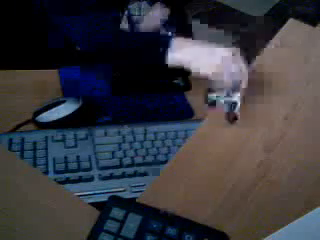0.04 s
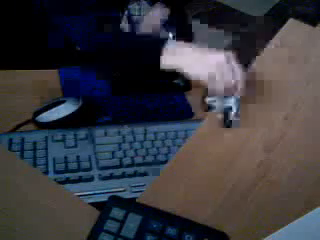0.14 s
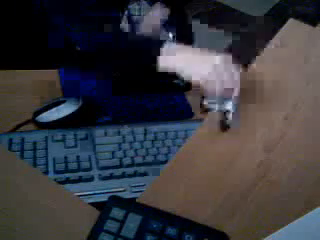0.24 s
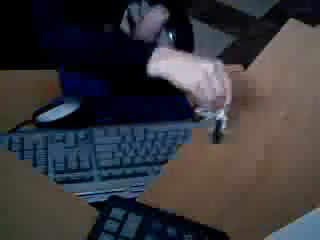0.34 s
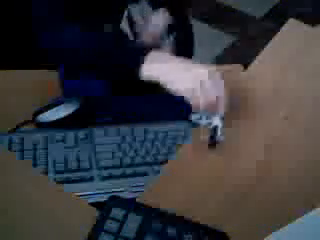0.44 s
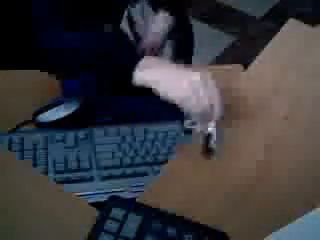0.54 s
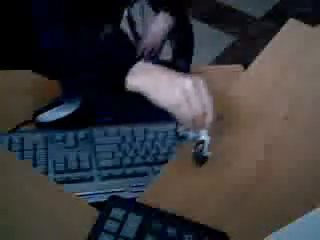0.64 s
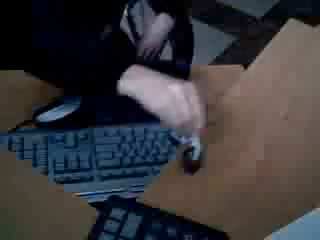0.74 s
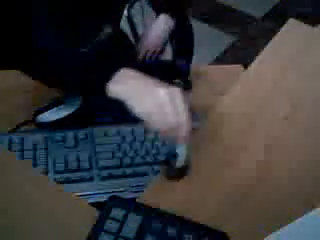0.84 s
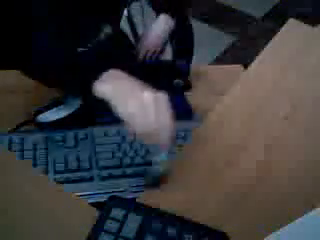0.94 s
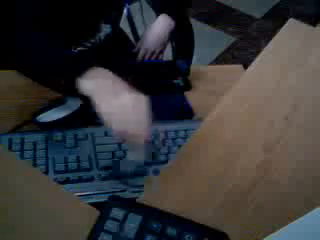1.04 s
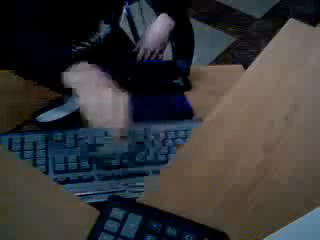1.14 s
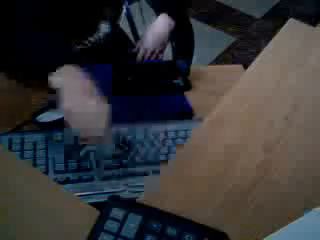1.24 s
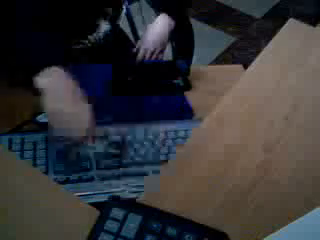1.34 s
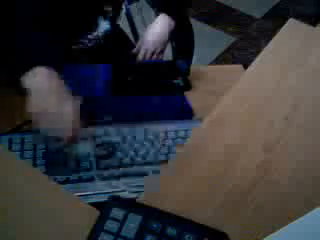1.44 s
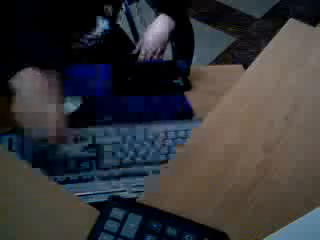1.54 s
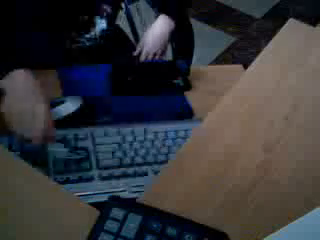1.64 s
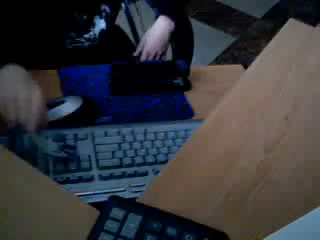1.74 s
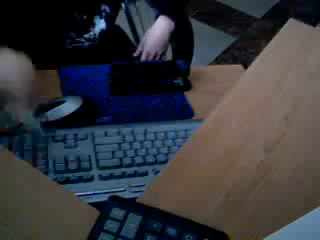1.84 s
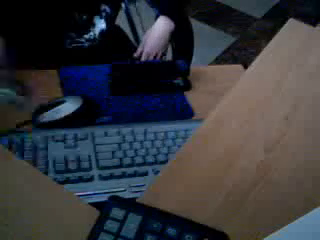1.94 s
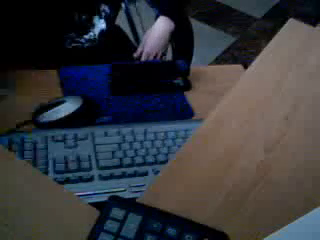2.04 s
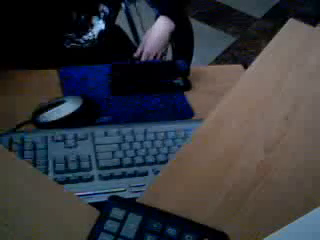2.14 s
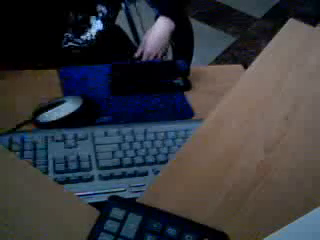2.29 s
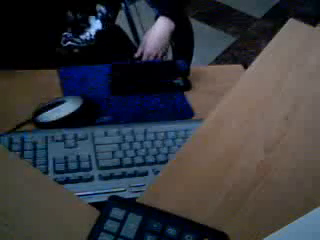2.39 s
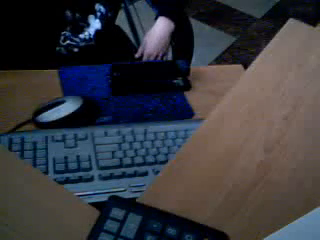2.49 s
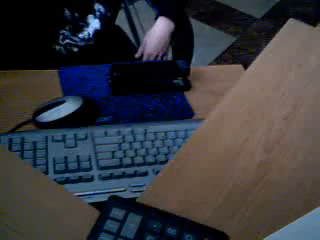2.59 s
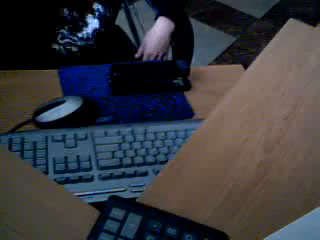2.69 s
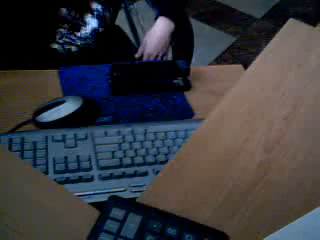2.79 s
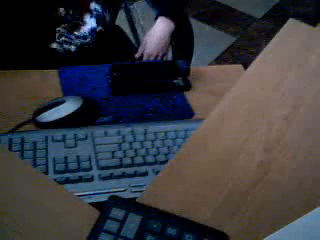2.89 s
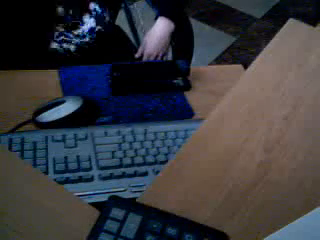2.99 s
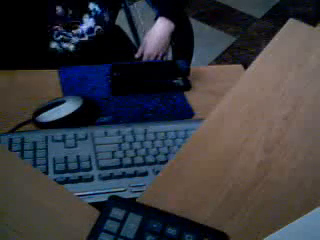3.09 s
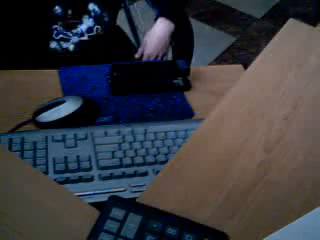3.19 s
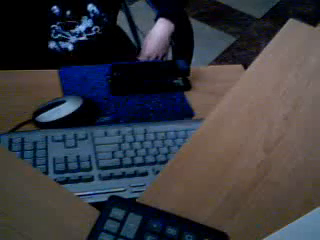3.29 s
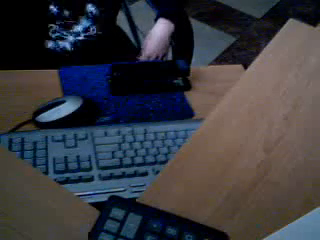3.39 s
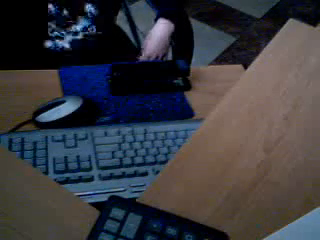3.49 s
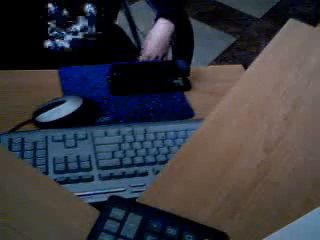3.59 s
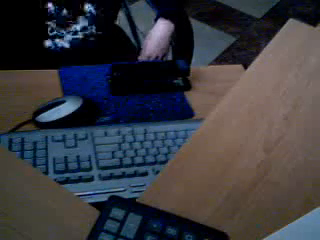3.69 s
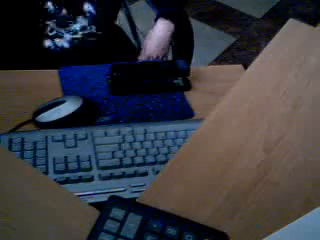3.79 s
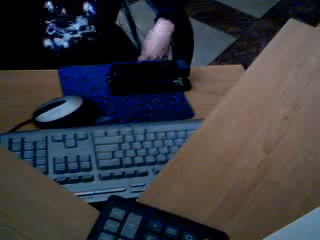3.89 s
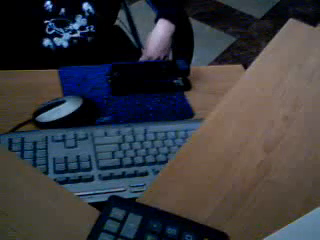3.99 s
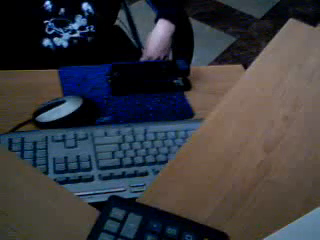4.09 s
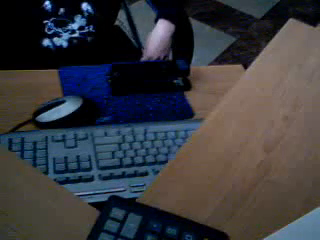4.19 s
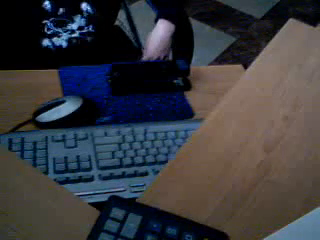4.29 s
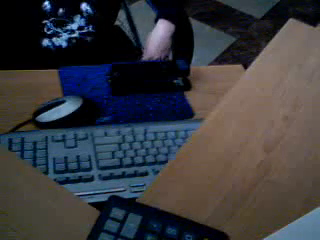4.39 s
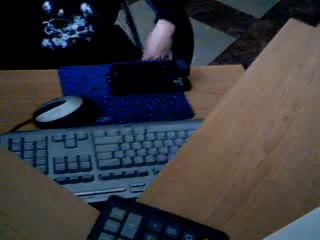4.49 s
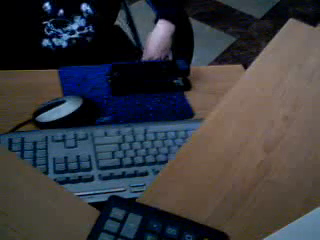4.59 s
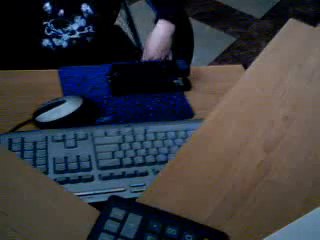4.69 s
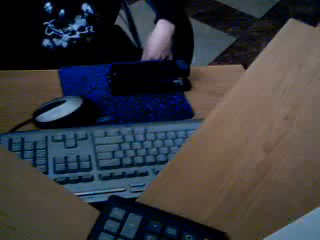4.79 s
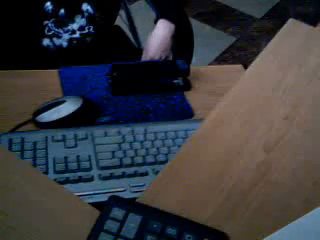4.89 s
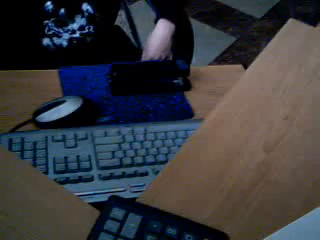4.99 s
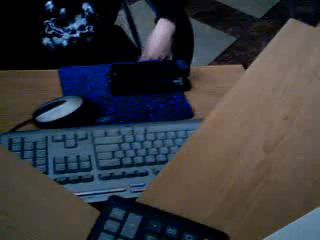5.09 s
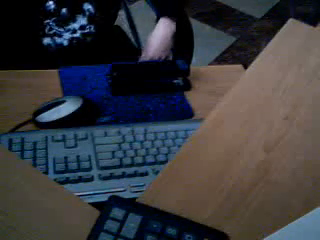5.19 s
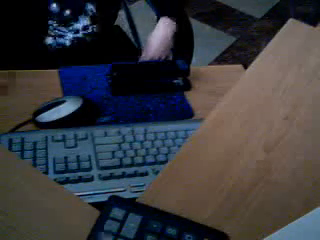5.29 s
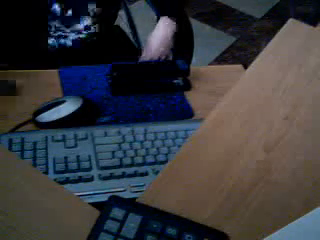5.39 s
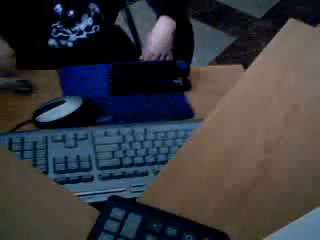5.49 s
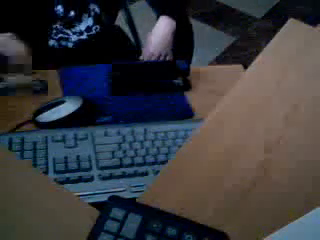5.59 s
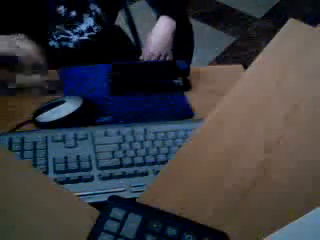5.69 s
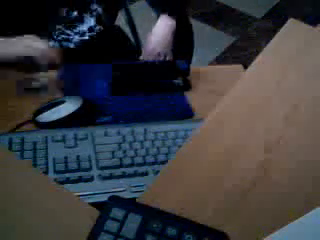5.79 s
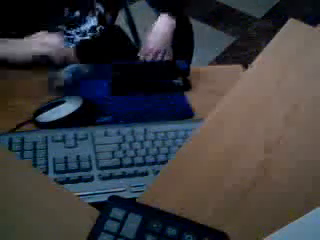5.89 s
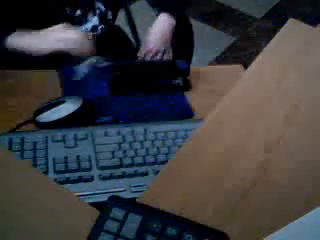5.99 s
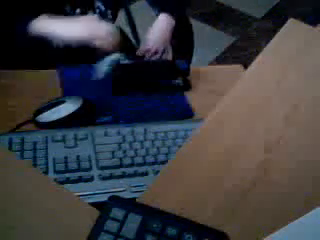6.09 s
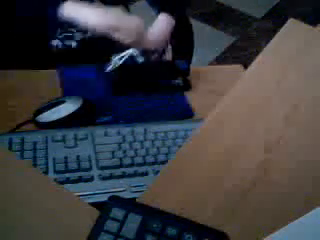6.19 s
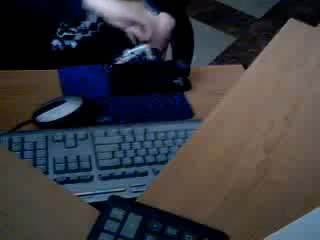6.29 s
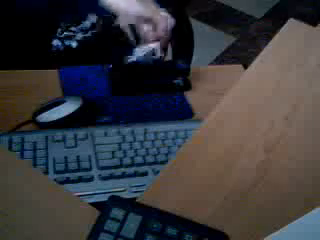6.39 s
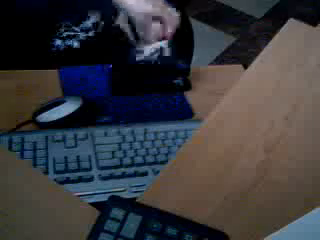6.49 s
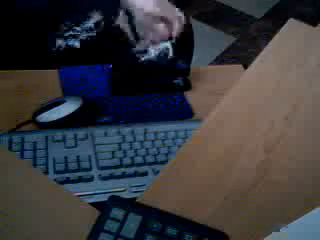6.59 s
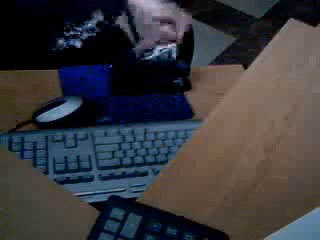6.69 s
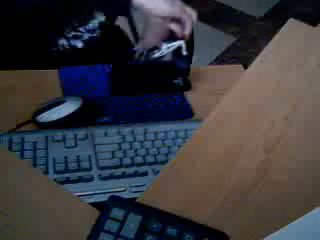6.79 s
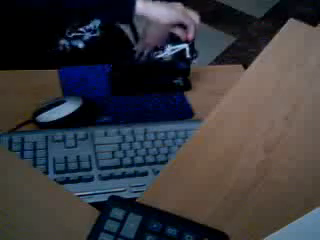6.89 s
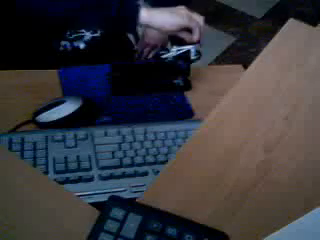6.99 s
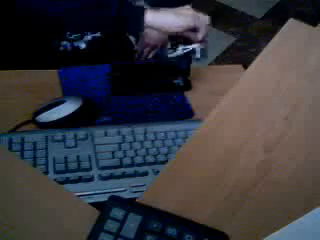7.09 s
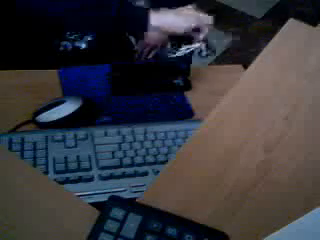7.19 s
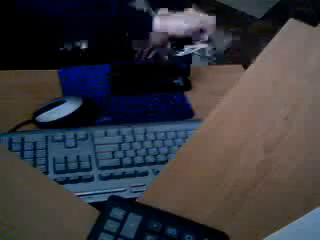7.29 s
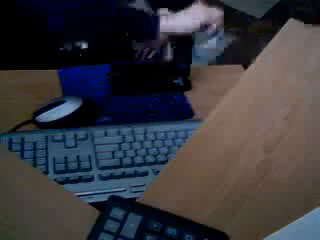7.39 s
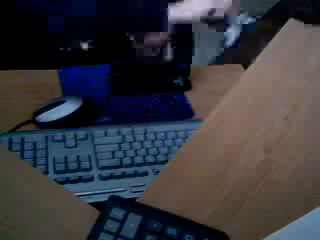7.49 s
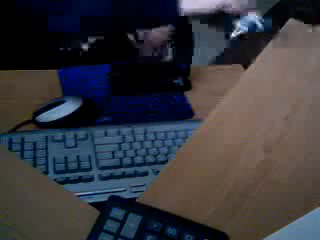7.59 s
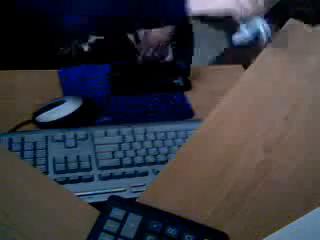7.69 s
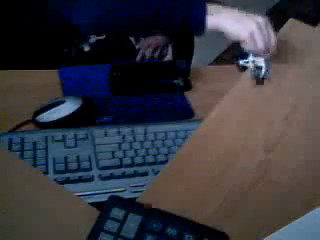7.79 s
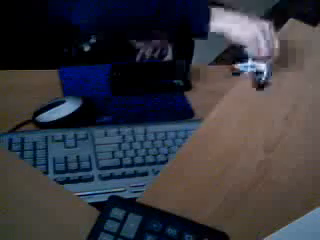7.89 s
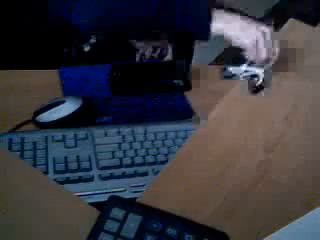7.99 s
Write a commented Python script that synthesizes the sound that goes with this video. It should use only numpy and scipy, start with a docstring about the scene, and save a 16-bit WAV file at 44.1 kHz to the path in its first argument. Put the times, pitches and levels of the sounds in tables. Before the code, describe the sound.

Tiny wheels rumble briefly on wood, followed by irregular knocks and ringing clicks from a toy bike, close to a humming microphone.

```python
"""Wood rumbles and clacks, with small metal clicks: a finger bike rolls down a wooden board, hops over
a keyboard, is knocked about on the desk and lands on the board again. Its wheels shake the board,
each blow makes the wood ring, and the little metal frame clicks and rings. A cheap desk microphone
adds hum and hiss and overloads on the hardest landings. A thin echo, as from desk speakers, follows
each bright click."""
import sys
import numpy as np
from scipy import signal
from scipy.fft import rfft, irfft, next_fast_len
from scipy.io import wavfile

SR = 44100
rng = np.random.default_rng(int(sys.argv[2]) if len(sys.argv) > 2 else 0)


def transcribe(signal):
    """Save signal, clipped to [-1, 1], as a 16-bit WAV file at the path in sys.argv[1]."""
    frames = np.atleast_2d(signal).T
    limited = np.clip(frames, -1, 1)
    pcm = np.round(limited * 32767).astype(np.int16)
    wavfile.write(sys.argv[1], SR, pcm)


N = 355005
T = np.arange(int(.7 * SR)) / SR  # time within one blow
HZ = np.fft.rfftfreq(4096, 1 / SR)  # the pitches at which tone curves are drawn


def amp(db):
    """Turns decibels into a volume factor."""
    return 10 ** (np.asarray(db) / 20)


def evened(x):
    """Scales a sound to an average (rms) level of 1."""
    return x / np.sqrt(np.mean(x ** 2) + 1e-20)


def curve(points):
    """Joins (pitch_hz, level_db) points into a tone curve."""
    hz, db = np.transpose(points)
    return np.interp(np.log(HZ + 1), np.log(hz + 1), db)


def bell(hz, octaves):
    """A hump of height 1 around the pitch hz."""
    return np.exp(-.5 * (np.log2((HZ + 1) / hz) / octaves) ** 2)


def colour(x, db):
    """Filters a sound by a tone curve, so that nothing rings before it starts."""
    log_gain = np.log(amp(np.r_[db, db[-2:0:-1]]))
    taps = np.fft.ifft(np.exp(np.conj(signal.hilbert(log_gain)))).real
    return signal.fftconvolve(x, taps)[:len(x)]


def low_pass(x, hz):
    """Cuts away the treble above hz."""
    taps = signal.firwin(511, hz, window=("kaiser", 8), fs=SR)
    return signal.oaconvolve(x, taps[None], "same")


def fade(t60):
    """Dies away by 60 dB in t60 seconds."""
    return np.exp(-np.log(1000) * T / max(t60, 1e-3))


def sized(x, t60):
    """Gives a blow the energy of a sound that starts at level 1 and dies in t60 seconds."""
    return x * np.linalg.norm(fade(t60)) / np.linalg.norm(x)


def add(mix, start_s, sound):
    """Mixes a sound in at start_s."""
    part = mix[max(round(start_s * SR), 0):][:len(sound)]
    part += sound[:len(part)]


def hiss(level_db=-40.5):
    """Room rumble and microphone hiss, with a small peak in the treble."""
    # tone of the steady noise: pitch_hz, level_db
    noise_tone = [(22, 5), (33, -25), (57, 3.5), (95, -18.5), (135, -4), (215, -14), (300, -22.5),
                  (680, -20.5), (1500, -21), (1900, -26.5), (3400, -26.5), (6950, -26), (7300, -31.5),
                  (8100, -30.5)]
    tone_db = curve(noise_tone) + 4 * bell(4870, 0.053)
    return amp(level_db) * evened(colour(rng.standard_normal(N), tone_db))


def hum(waver=0.025):
    """Mains hum in the microphone, wavering slightly."""
    # the hum's tones: pitch_hz, level_db
    tones = [(59.5, -52.5), (119, -49.5)]
    t = np.arange(N) / SR
    drift = waver * np.interp(t, np.linspace(0, N / SR, 60), rng.standard_normal(60))
    return sum(np.sqrt(2) * amp(db) * np.sin(2 * np.pi * hz * t + drift) * (1 + drift)
               for hz, db in tones)


def room(x, wet_db=-12, t60=0.52):
    """Adds the room's many reflections as a dying tail."""
    tail = rng.standard_normal(len(T)) * fade(t60)
    return x + amp(wet_db) * signal.fftconvolve(x, tail / np.linalg.norm(tail))[:len(x)]


def speaker_echo(x, delay_s=.2235):
    """Small speakers repeat the sound late and thin, then repeat their own echo."""
    thin_db = -12.5 - 26 * (1 - bell(4900, 0.064))
    echoes = np.zeros(N)
    for turn in (1, 2):
        x = room(colour(x, thin_db), wet_db=-0.5, t60=.25)
        add(echoes, turn * delay_s, x)
    return echoes


def ring(tones, spread_db, damping=1):
    """A struck object's dying tones; random strengths and signs stand for the spot that is hit."""
    shares = amp(spread_db * rng.standard_normal(len(tones))) * rng.choice([-1, 1], len(tones))
    return sum(share * amp(db) * np.sin(2 * np.pi * hz * T) * fade(t60 / damping)
               for share, (hz, db, t60) in zip(shares, tones))


def wood(t60, damping, tones_db):
    """Struck wood rings at a few main pitches, with noisy clatter between them."""
    # ringing tones of board and desk: pitch_hz, level_db, fade_s (before damping)
    wood_tones = [(115.9, -16, 0.39), (212.8, -7, 0.19), (247.4, -9.5, 0.19), (298.8, -5.5, 0.17),
                  (398, -3.5, 0.22), (504, -9.5, 0.088), (578, -16, 0.28), (660, -4.5, 0.2),
                  (731.7, -11, 0.28), (850, -1.5, 0.11), (975, -1.5, 0.069), (1063, -4, 0.067),
                  (1097, -2, 0.12), (1184.5, -1.5, 0.17), (1295, -3, 0.15), (1400, -4.5, 0.14),
                  (1490, -0.5, 0.051), (1566, -9.5, 0.094), (1758, -9, 0.082), (1972, -15, 0.13)]
    # tone of the clatter: pitch_hz, level_db
    clatter_tone = [(50, -44), (110, -1.5), (230, -7), (420, -2), (520, -4.5), (800, -1.5), (1200, -1.5),
                    (1500, -4.5), (1800, -11.5), (2300, -23.5), (3500, -35), (5000, -24), (8000, -53.5)]
    clatter = colour(rng.standard_normal(len(T)) * fade(t60), curve(clatter_tone))
    return evened(clatter) + amp(tones_db) * evened(ring(wood_tones, spread_db=2, damping=damping))


def effort(rise_s=0.022, coast_db_per_s=136.5, handling_db=-50.5):
    """How hard the wood is rubbed: each push starts quickly, speeds up or slows, then coasts out."""
    # pushes of the bike: start_s, length_s, start_level_db, slope_db_per_s
    pushes = [(0.116, .57, -42.5, 24.5), (0.829, 0.11, -27.5, -66), (1.558, 0.18, -46.5, -15),
              (2.29, 0.51, -44, -6), (2.864, 0.37, -43, -5.5), (3.867, 0.032, -45.5, 0),
              (4.46, 0.098, -40.5, -44), (4.71, 0.25, -46.5, -15), (6.7, 0.3, -51.5, -15),
              (7.88, 0.14, -35, -20)]
    t = np.arange(N) / SR
    power = np.full(N, amp(handling_db) ** 2)  # the fingers never quite rest
    for start_s, length_s, level_db, slope in pushes:
        age = t - start_s
        pushed_db = level_db + slope * np.clip(age, 0, length_s)
        coast_db = coast_db_per_s * np.maximum(age - length_s, 0)
        power += (np.clip(age / rise_s, 0, 1) * amp(pushed_db - coast_db)) ** 2
    return np.sqrt(power)


def rolling(jolts_per_s=700, spots=3):
    """Wheels and fingers pass over the grain, and its tiny jolts shake the board at a few spots."""
    # how strongly the tyres shake the board: pitch_hz, level_db
    tyre_tone = [(60, -10.5), (150, 9.5), (225, 13.5), (300, 4), (400, 5.5), (600, 8), (880, 1), (1400, 0),
                 (2000, -0.5), (8000, -18.5)]
    rumble = np.zeros(N)
    for _ in range(spots):
        sizes = amp(3.5 * np.minimum(rng.exponential(1, N), 3)) * rng.choice([-1, 1], N)
        jolts = sizes * (rng.random(N) < jolts_per_s / spots / SR)
        board = colour(wood(0.065, damping=0.95, tones_db=2.5), curve(tyre_tone))
        rumble += signal.fftconvolve(jolts, board)[:N]
    return evened(rumble) * effort()


def frame_clicks(t60=.065, rise_s=0.00086):
    """The bike's hard parts give short, bright cracks, and its metal frame rings in the room."""
    # clicks: start_s, crack_db, pitch_hz, width_octaves, ring_db
    clicks = [ (0.82, -31.5, 4000, .45, -59), (1.195, -29.5, 6900, 0.11, -37),
              (1.207, -25.5, 4900, 0.76, -54), (1.293, -35.5, 4670, 0.6, -46), (2.017, -23, 4870, .1, -57),
              (2.068, -27.5, 3330, 0.36, -43), (2.326, -40, 4700, 0.15, -50),
              (3.441, -38.5, 4730, 0.16, -60), (3.516, -32, 2380, 0.29, -46),
              (3.519, -22, 4985, .12, -37.5), (3.982, -38.5, 3900, .3, -68), (5.243, -21.5, 1970, .08, -44),
              (5.245, -26.5, 2610, 0.074, -51), (5.260, -31, 5200, 0.42, -50),
              (6.039, -43.5, 4560, .18, -64), (6.629, -35, 4950, .2, -36.5), (7.147, -31, 6500, 0.67, -60),
              (7.153, -20, 5470, 0.46, -25.5), (7.153, -23, 2560, 0.083, -53),
              (7.154, -24.5, 1170, 0.22, -60), (7.765, -26.5, 3800, .42, -42)]
    # ringing tones of the frame: pitch_hz, level_db, fade_s
    frame_tones = [(4253, -10.5, 0.46), (4313, -3, 0.1), (4743, 4, 0.099), (4730, -12.5, .45),
                   (4850, -21.5, 0.25), (5770, -3.5, 0.11), (5900, -27, 0.096), (7050, -6.5, 0.13),
                   (7300, -22, 0.12), (7300, -23, 0.12)]
    mix = np.zeros(N)
    for start_s, crack_db, pitch_hz, octaves, ring_db in clicks:
        burst = rng.standard_normal(len(T)) * fade(t60) * (1 - np.exp(-T / rise_s))
        tone_db = 20 * np.log10(bell(pitch_hz, octaves) + amp(-26))
        crack = amp(crack_db) * sized(colour(burst, tone_db), t60)
        metal = amp(ring_db) * ring(frame_tones, spread_db=-4)
        add(mix, start_s, room(crack + metal))
    return mix


def late_bass(x, lag_s=0.004115, corner_hz=600):
    """Low bending waves cross the board more slowly, so the bass arrives late."""
    size = next_fast_len(2 * len(x))
    hz = np.fft.rfftfreq(size, 1 / SR)
    delay_s = lag_s / (1 + (hz / corner_hz) ** 4)
    phase = 2 * np.pi * np.cumsum(delay_s) * hz[1]
    return irfft(rfft(x, size) * np.exp(-1j * phase), size)[:len(x)]


def knock(tone_db, t60, tail_db, desk_t60=0.51):
    """One blow on wood, damped by the hand, after which desk and room ring on."""
    blow = colour(wood(t60, damping=0.16 / t60, tones_db=2), tone_db)
    tail = colour(wood(desk_t60, damping=0.55, tones_db=0.5), tone_db)
    blow *= 1 - np.exp(-T / 0.0012)  # the first touch is soft
    swell = 1 - np.exp(-T / 0.014)  # the desk takes a moment to answer
    return late_bass(sized(blow, t60) + amp(tail_db) * swell * sized(tail, desk_t60))


def hand_bumps():
    """The hand bumps the desk: soft, broad blows that wake its low tones."""
    # dull bumps: start_s, level_db, pitch_hz
    bumps = [(5.874, -37, 149), (6.046, -34, 148), (6.629, -33.5, 195), (7.165, -37, 150)]
    mix = np.zeros(N)
    for start_s, level_db, pitch_hz in bumps:
        tone_db = 25 * bell(114, 0.33) + 21 * bell(pitch_hz, 0.1)
        add(mix, start_s, amp(level_db) * knock(tone_db, t60=0.32, tail_db=-17))
    return mix


def bike_knocks(leaves_board_s=1.1, back_on_board_s=7.5):
    """The bike clacks on the wood; each spot it strikes boosts a pitch of its own."""
    # blows on wood: start_s, level_db, hollow_db, hard_db, spot_hz, spot_boost_db, tail_db
    knocks = [ (0.031, -36, 3, -4, 1290, -4, -2), (0.150, -35.5, 10, 1, 1320, 0, -8),
              (0.767, -27.5, 22, -13, 290, 9, -28), (0.796, -28.5, 30, -1, 230, 6, -31),
              (0.822, -19.5, 12, 2, 330, 1, -22), (0.871, -24.5, 11, -2, 1450, 8, -21),
              (0.907, -28.5, 21, -9, 1190, 14, -19), (1.202, -22.5, -5, 4, 1060, 4.5, -8),
              (1.294, -29, -6.5, 1, 1040, -2, -7), (1.504, -33.5, 1, -6, 1080, 0, -3.5),
              (2.015, -11.5, 1.5, -1, 1354, 6.5, -23), (2.022, -14, 5.5, 1, 1730, 12.5, -15),
              (2.067, -4, 4.5, 5, 1450, 6.5, -15.5), (2.095, -16.5, -5.5, -9, 1480, 6, -7),
              (2.342, -33.5, -5, 5, 1280, 2, -6), (2.412, -31.5, 4, -10, 1150, 3, -3.5),
              (3.017, -33, 12, 6, 1360, -1, -24), (3.437, -21.5, 2.5, -16, 1090, 3, -7.5),
              (3.516, -10, -7.5, 8.5, 1528, 18.5, -17.5), (3.526, -19, 7.5, -6, 262, 11, -11.5),
              (3.984, -29.5, 10, 12, 1510, 14, -21), (4.012, -33, 7, 4, 1550, 7, -17),
              (4.384, -23.5, 7.5, -19, 970, 3, -10), (5.242, -10.5, -3.5, -2, 1340, 3.5, -9),
              (5.263, -15.5, 0.5, -1, 568, 15.5, -13.5), (6.039, -36.5, -22, 0, 860, 2, -14),
              (6.138, -36, -13, 12, 800, 19, -14), (7.765, -3, 2.5, -1.5, 1070, 4.5, -15.5),
              (7.813, -18, -2, -7, 1330, 3, -9)]
    mix = np.zeros(N)
    for start_s, level_db, hollow_db, hard_db, spot_hz, spot_boost_db, tail_db in knocks:
        # the loose board gives a deep thud, the solid desk hardly any
        thud_db = -6.5 if leaves_board_s < start_s < back_on_board_s else 1
        body_db = thud_db * bell(114, 0.33) + hollow_db * bell(284, 0.69)
        tone_db = body_db + hard_db * bell(2110, 0.23) + spot_boost_db * bell(spot_hz, 0.1)
        add(mix, start_s, amp(level_db) * knock(tone_db, t60=0.098, tail_db=tail_db))
    return mix


def scene():
    """The bike, the hand and their echo over hiss and hum, in one channel."""
    action = rolling() + bike_knocks() + hand_bumps() + frame_clicks()
    return (action + speaker_echo(action) + hiss() + hum())[None]


def record(dry):
    """The input overloads on hard landings; the next stage clips again and spits a little treble."""
    narrow = low_pass(np.clip(dry, -1, 1), hz=8150)
    return low_pass(np.clip(narrow, -.7, .7), hz=11000)


dry = scene()
out = record(dry)
transcribe(out)
```